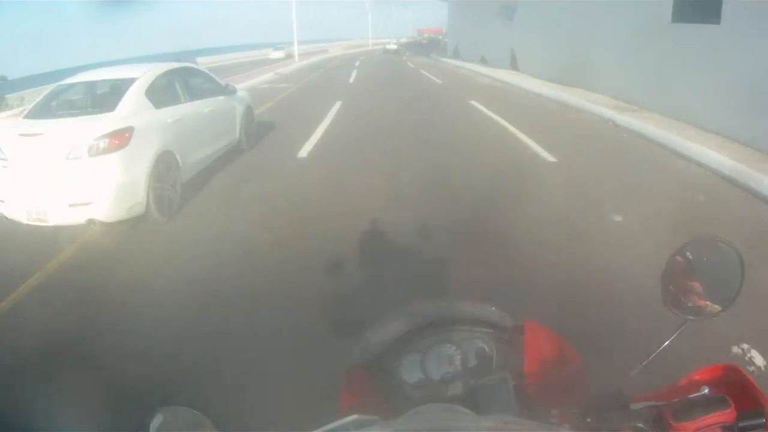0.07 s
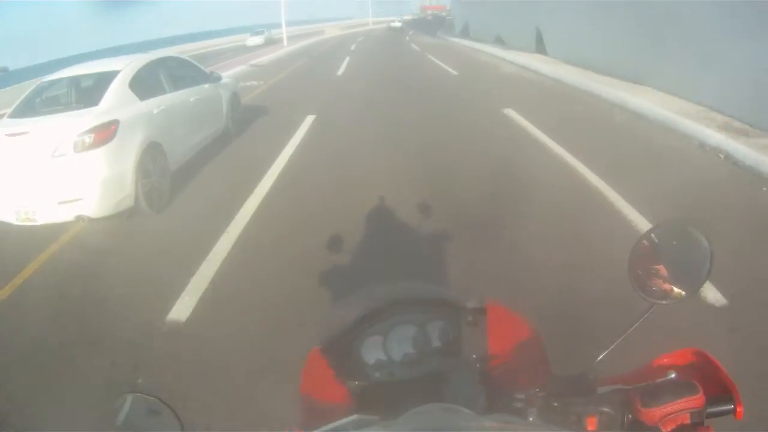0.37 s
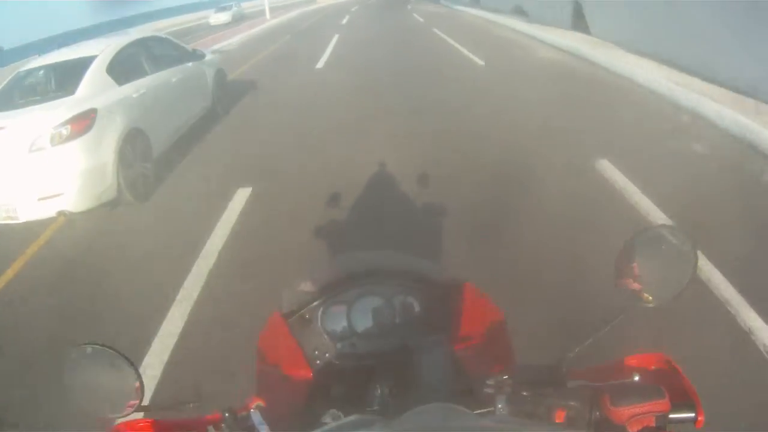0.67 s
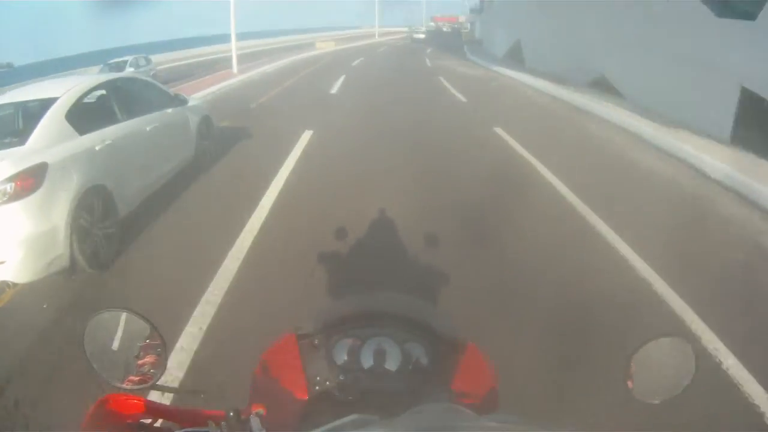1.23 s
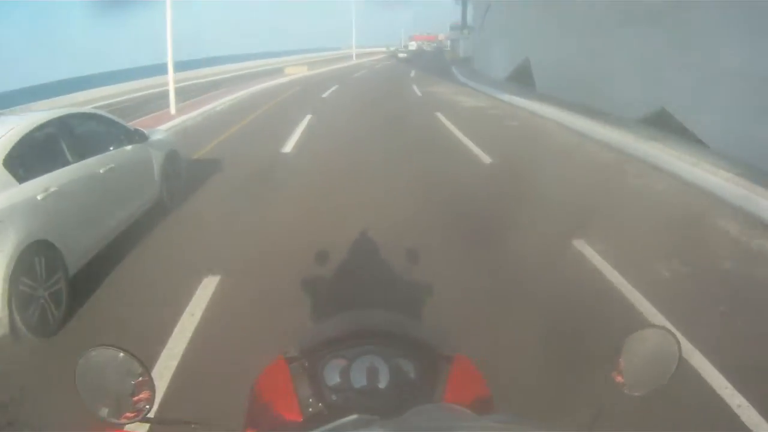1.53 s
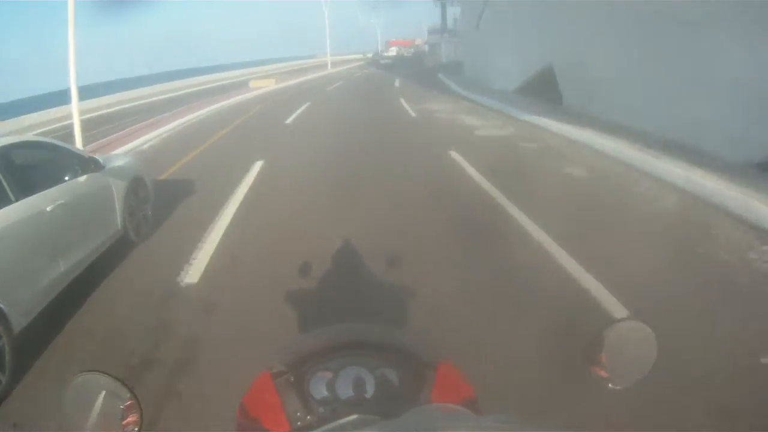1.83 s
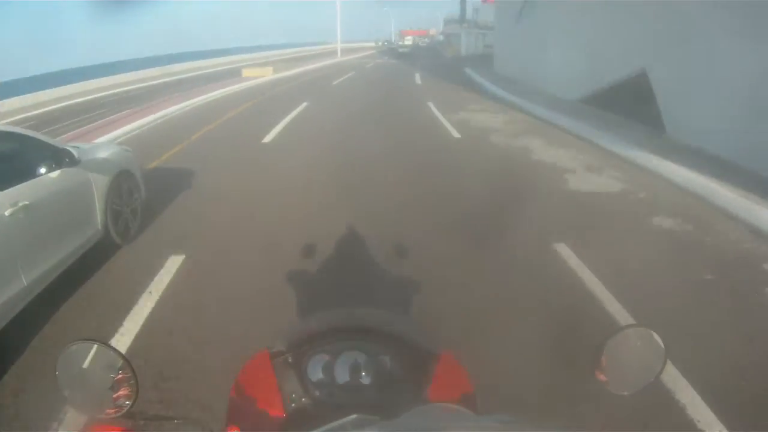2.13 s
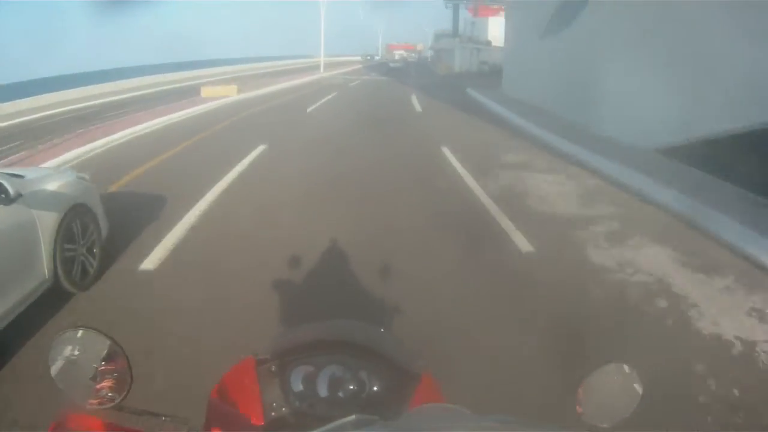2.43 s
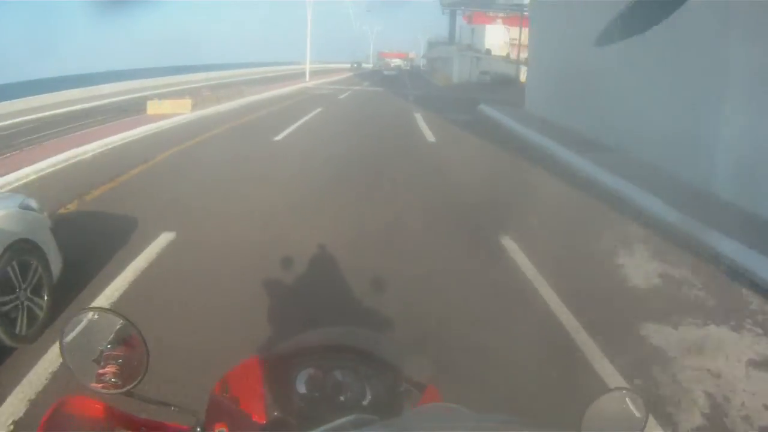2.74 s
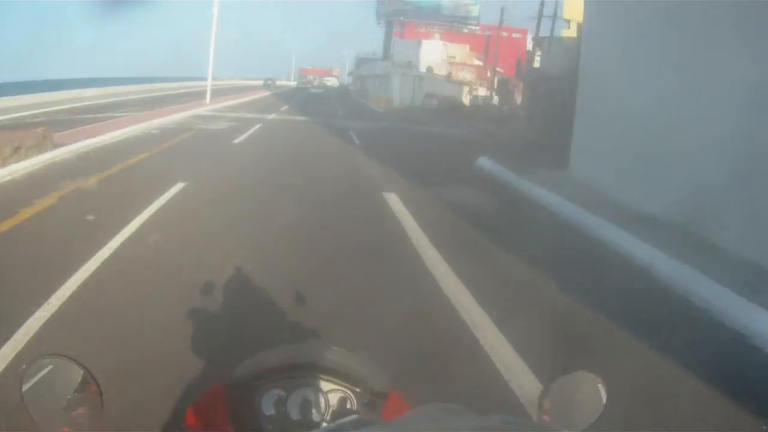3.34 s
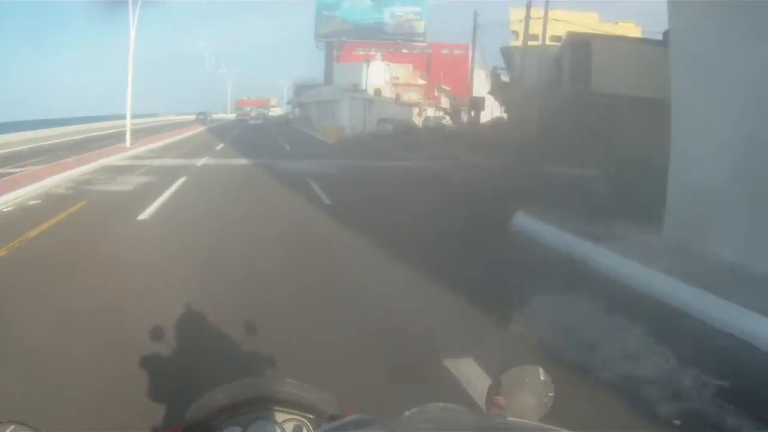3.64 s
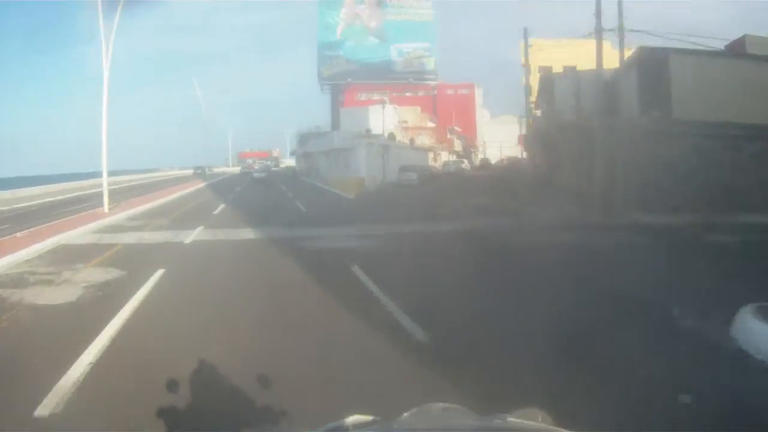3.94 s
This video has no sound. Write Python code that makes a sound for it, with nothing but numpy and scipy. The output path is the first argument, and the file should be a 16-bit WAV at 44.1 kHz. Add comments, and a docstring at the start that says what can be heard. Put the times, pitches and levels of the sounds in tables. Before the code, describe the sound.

A high air squeal wavers between raspy and piercing close to the microphone on a moving motorcycle. It sinks, breaks into chirps and dies away, over air hiss, wind thumps, tyre roar and engine drone.

```python
"""Air squeals near the microphone of a camera on a motorcycle rider, probably by crossing a narrow gap.
The jet of air swings across an edge and makes a wavering tone, now raspy, now locked into a clean
whistle. The squeal sinks, breaks into low chirps and dies away. Behind it are the hiss of the air,
wind thumping on the microphone, tyre roar and the drone of the engine, which swells as the
motorcycle passes a car on a coast road."""
import sys
import numpy as np
from scipy.fft import rfft, irfft, next_fast_len
from scipy.io import wavfile
from scipy.ndimage import uniform_filter1d, map_coordinates

SR = 44100
rng = np.random.default_rng(int(sys.argv[2]) if len(sys.argv) > 2 else 0)


def dump(signal):
    """Clip the signal to [-1, 1] and save it as 16-bit WAV at the path in sys.argv[1]."""
    limited = np.clip(np.atleast_2d(signal).T, -1, 1)
    pcm = np.round(limited * 32767).astype(np.int16)
    wavfile.write(sys.argv[1], SR, pcm)


N = 176400  # 4 seconds

# Levels in the tables are relative: the functions add their own gains.
# Wind on the microphone. Each row: time in seconds, level in dB.
BUFFET_LEVEL = [(0.0, -35), (0.55, -41), (0.62, -36), (2.45, -37), (2.56, -40), (2.7, -36.5), (3.56, -39),
                (3.74, -33), (3.81, -41), (4.0, -33)]
# Single gusts. Each row: middle in seconds, length in seconds, thump in dB, hiss in dB.
GUSTS = [(0.368, 0.063, -30, -53), (1.779, 0.075, -25.5, -43), (3.645, 0.092, -29, -44)]
# Tone colours of wind rumble and gust hiss. Each row: frequency in Hz, level in dB.
BUFFET_COLOUR = [(4, -17), (15, 5), (30, -0.5), (50, 0), (80, -7), (130, -9), (300, -46), (1000, -77)]
GUST_COLOUR = [(4000, -2), (10000, 0), (15000, -14)]

# Loudness of the tyre and machine roar, and of the engine. Each row: time in seconds, level in dB.
ROAR_LEVEL = [(0.0, -38.5), (1.6, -39), (2.1, -37.5), (3.8, -39), (4.0, -42)]
ENGINE_LEVEL = [(0, -44.5), (1.3, -41.5), (1.85, -37.5), (2.6, -42), (4, -44.5)]
# Tone colours of the roar and of the thrum of uneven firing. Each row: frequency in Hz, level in dB.
ROAR_COLOUR = [(40, -13), (110, -1), (170, 4), (250, -1), (350, -0.5), (480, -3), (600, -6.5), (780, 0),
               (950, 0), (1030, -3), (1150, 2.5), (1400, -3), (1600, -5), (2100, -5), (3000, -12.5),
               (6000, -27)]
THRUM_COLOUR = [(50, -30), (100, -4), (135, 1.5), (175, -7), (230, -9.5), (330, -10), (600, -34)]
# Resonances (pitches that ring) in the roar. Each row: frequency in Hz, width in Hz, level in dB.
ROAR_PEAKS = [(398, 17.6, -3.5), (691, 27, -7), (853, 71, -3.5), (1239, 49, -3), (1823, 45, -7.5)]
# The engine's tones. Each row: multiple of the firing rate, level in dB.
ENGINE_TONES = [(1, -20), (2, -9), (3, -8.5)]

# Airflow over the gap. Each row: time in seconds, level of its hiss in dB.
FLOW_LEVEL = [(0.0, -42.5), (0.3, -44), (0.81, -43.5), (0.93, -46), (0.98, -43.5), (1.17, -43.5),
              (1.19, -43), (1.69, -47), (1.7, -49.5), (2.27, -43.5), (2.52, -48), (3.27, -48.5),
              (3.59, -53.5), (3.7, -53), (4.0, -57)]
# Tone colour of that hiss. Each row: frequency in Hz, level in dB.
HISS_COLOUR = [(800, -6.5), (1800, 9.5), (2700, 7), (4300, 2.5), (5300, 9), (5700, 0), (6000, 5),
               (6550, -4.5), (7300, 9.5), (7700, 8), (8100, 0), (8800, 1.5), (10300, 6.5), (11400, 3.5),
               (12900, -7), (14000, -1.5), (15300, -14)]
# Resonances of the gap. Each row: frequency in Hz, width in Hz, level in dB.
GAP_PEAKS = [(3364, 580, -3), (3808, 190, 1.5), (7920, 420, -18.5)]
STRONG_FLOW_PEAKS = [(2286, 170, 4), (4490, 110, 5), (4984, 120, 10), (8190, 310, 0.5), (9400, 190, -24)]  # these need a strong flow
OCTAVE_PEAKS = [(8200, 260, 5.5), (9360, 420, 2)]  # these colour the octave, the tone at twice the jet's pitch

# Chirps. Each row: middle in seconds, length in seconds, pitch in Hz, level in dB.
CHIRPS = [(0.356, 0.027, 3620, -28), (0.467, 0.045, 3700, -27.5), (0.953, 0.018, 2310, -29),
          (.972, 0.022, 4870, -26.5), (1.281, 0.0049, 3665, -18.5), (1.304, .012, 3780, -28),
          (1.365, .009, 3710, -22.5), (1.384, 0.033, 4900, -23), (1.411, 0.014, 4920, -27),
          (1.496, 0.029, 2190, -30.5), (1.549, 0.018, 3240, -25), (1.787, .014, 4810, -32),
          (1.878, 0.05, 3240, -35), (2.165, 0.018, 4875, -27.5), (2.183, 0.011, 3500, -26),
          (2.228, 0.048, 2242, -28), (2.33, 0.029, 4920, -24), (2.371, 0.024, 4885, -25),
          (2.682, 0.034, 3250, -29.5), (2.736, .026, 3200, -30.5), (2.782, 0.027, 3090, -27.5),
          (2.822, 0.053, 3130, -34.5), (2.856, 0.029, 3160, -30), (2.861, 0.021, 3990, -31),
          (2.886, 0.031, 3240, -28.5), (2.94, 0.024, 3166, -26.5), (2.955, 0.0266, 3340, -29.5),
          (2.999, 0.027, 3990, -28), (3.037, 0.037, 4015, -31.5), (3.098, 0.035, 3320, -29),
          (3.122, .018, 4380, -36), (3.187, 0.028, 4200, -33.5), (3.35, 0.021, 2900, -33.5),
          (3.368, 0.019, 3000, -29.5), (3.423, 0.028, 3050, -32), (3.425, 0.019, 3770, -31.5),
          (3.45, .012, 2960, -28), (3.458, 0.021, 3830, -28), (3.463, 0.014, 2950, -32)]
# Chirps turn scratchy as the flow weakens. Each row: time in seconds, share of turbulence from 0 to 1.
CHIRP_RASP = [(2.3, .03), (2.7, .12)]
# The raspy squeal: a high stretch, then a low one. Each row: time in seconds, pitch in Hz, level in dB.
SQUEAL_STRETCHES = [
    [(0.0, 4590, -33.5), (0.12, 4770, -34), (0.18, 4540, -32.5), (0.28, 4592, -32.5), (0.54, 4797, -36),
     (0.59, 4680, -33.5), (0.77, 4766, -37), (0.86, 4710, -33.5), (0.91, 4350, -40), (0.97, 4780, -37),
     (1.0, 4620, -32.5), (1.32, 4680, -34.5), (1.41, 4810, -37), (1.55, 4155, -40.5), (1.66, 4500, -31.5),
     (1.73, 3774, -57), (1.79, 4467, -38.5), (1.91, 4080, -37), (1.935, 4300, -47), (1.955, 4520, -33),
     (1.995, 4300, -46), (2.14, 4450, -32), (2.185, 4150, -45), (2.24, 4553, -30.5), (2.38, 4830, -43),
     (2.42, 4410, -44)],
    [(2.48, 4200, -45), (2.64, 4160, -43), (2.74, 4086, -40), (2.81, 3885, -71), (2.89, 4080, -36),
     (2.94, 3950, -38), (2.984, 3911, -32.5), (3.06, 3947, -34.5), (3.15, 3880, -50), (3.25, 3910, -45)],
]
# The squeal's octave. Each row: time in seconds, level in dB relative to the squeal.
OCTAVE_LEVEL = [(1.4, -15), (1.55, -6), (1.87, -13.5), (2.0, -20), (2.2, -8), (2.28, -13), (2.34, -18),
                (2.93, -21), (3.02, -7.5), (3.08, -29)]
# The gap's lowest tone, about an octave below the squeal. Each row: time in seconds, level in dB.
UNDERTONE_LEVEL = [(0.0, -44), (1.17, -48.5), (1.32, -35), (1.5, -64), (1.57, -33.5), (1.72, -42),
                   (1.9, -45), (2.05, -33.5), (2.22, -39.5), (2.32, -49), (2.36, -32), (2.41, -39.5),
                   (2.9, -49.5), (3.02, -40), (3.12, -44.5)]
# Clean whistles, one list for each time the jet locks. Each row: time in seconds, pitch in Hz, level in dB.
WHISTLES = [
    [(0.21, 4500, -35), (0.23, 4490, -28), (0.288, 4640, -32), (0.314, 4500, -27), (0.325, 4560, -30)],
    [(0.372, 4820, -34), (0.376, 4872, -25.5), (0.398, 4980, -27.5), (0.412, 4878, -36)],
    [(0.497, 4790, -26), (0.515, 4920, -25.5), (0.535, 4946, -30), (0.547, 4900, -31.5)],
    [(0.67, 4774, -33), (0.714, 4885, -31.5), (0.736, 4840, -31), (0.78, 4787, -33), (0.8, 4640, -35)],
    [(0.87, 4570, -34), (0.882, 4493, -26), (0.902, 4240, -33), (0.934, 4462, -25), (0.952, 4380, -29),
     (0.965, 4830, -33)],
    [(1.1, 4480, -37), (1.13, 4414, -25.5), (1.14, 4597, -32), (1.16, 4490, -31), (1.175, 4276, -26)],
    [(1.432, 4530, -31), (1.438, 4456, -24.5), (1.452, 4620, -32), (1.464, 4560, -26.5), (1.53, 4240, -37)],
    [(1.565, 4340, -28), (1.573, 4410, -27.5), (1.647, 4504, -30.5), (1.679, 4400, -28.5),
     (1.705, 3640, -31.5), (1.712, 3773, -23)],
    [(1.778, 4590, -34), (1.796, 4500, -33.5), (1.815, 4305, -38)],
    [(2.015, 4400, -39), (2.048, 4534, -30), (2.075, 4420, -44), (2.11, 4403, -34.5), (2.135, 4380, -45)],
    [(2.205, 4414, -34), (2.245, 4530, -32), (2.315, 4640, -32)],
]


def amp(db):
    """Turn decibels into a gain to multiply by."""
    return 10 ** (np.asarray(db) / 20)


def unit(x):
    """Scale a signal to an average strength (rms) of 1."""
    return x / np.sqrt(np.mean(x ** 2) + 1e-20)


def curves(rows):
    """Join the rows with straight lines: one curve for each column after the time."""
    times, *columns = np.transpose(rows)
    return [np.interp(np.arange(N) / SR, times, column) for column in columns]


def wobble(rate):
    """A smooth curve through `rate` random values a second."""
    return map_coordinates(rng.standard_normal(8192), [np.arange(N) * rate / SR], mode="wrap")


def gate(rows, ramp_s=0.011):
    """1 from the first row's time to the last, 0 outside, with short ramps between."""
    t = np.arange(N) / SR
    sounding = (t > rows[0][0]) & (t < rows[-1][0])
    return uniform_filter1d(sounding.astype(float), int(ramp_s * SR))


def filtered(x, response):
    """Scale each frequency in x by the gain that `response` gives it."""
    size = next_fast_len(N + 8192)
    return irfft(rfft(x, size) * response(np.fft.rfftfreq(size, 1 / SR)), size)[:N]


def resonances(peaks, f):
    """The gain at frequency f: high near a peak, low away from it."""
    return sum(amp(db) / (1 + ((f - hz) / (width * 0.66)) ** 2) for hz, width, db in peaks)


def coloured_noise(colour):
    """Noise of strength 1 with the given tone colour."""
    hz, db = np.transpose(colour)
    white = rng.standard_normal(N)
    return unit(filtered(white, lambda f: amp(np.interp(np.log(f + 1), np.log(hz), db))))


def ringing_noise(peaks):
    """Noise of strength 1 that rings at the given resonances."""
    return unit(filtered(rng.standard_normal(N), lambda f: resonances(peaks, f)))


def phase_of(hz):
    """The angle that a tone of moving pitch has turned through so far."""
    return 2 * np.pi * np.cumsum(hz) / SR


def turbulence(phase, width_hz):
    """Swirling air: a narrow band of noise, strength 1, around a moving pitch."""
    a, b = [filtered(rng.standard_normal(N), lambda f: 1 / (1 + (f / width_hz) ** 2)) for _ in range(2)]
    return unit(a * np.cos(phase) + b * np.sin(phase))


def wind_buffeting(gain_db=3):
    """Wind hits the microphone in low, rumbling lumps."""
    level_db, = curves(BUFFET_LEVEL)
    return amp(level_db + gain_db + 0.35 * wobble(4.1)) * coloured_noise(BUFFET_COLOUR)


def gusts():
    """Short puffs thump and hiss on the microphone."""
    t, out = np.arange(N) / SR, np.zeros(N)
    thump, hiss = coloured_noise(BUFFET_COLOUR), coloured_noise(GUST_COLOUR)
    for middle, length, thump_db, hiss_db in GUSTS:
        swell = np.cos(np.pi * np.clip((t - middle) / length, -0.5, 0.5))
        out += swell * (amp(thump_db) * thump + amp(hiss_db) * hiss)
    return out


def road_roar(noise_db=1.5, ring_db=-2.5):
    """Tyres and machine make a steady roar with a few ringing pitches."""
    level_db, = curves(ROAR_LEVEL)
    gain = amp(level_db + 0.99 * wobble(12))
    return gain * (amp(noise_db) * coloured_noise(ROAR_COLOUR) + amp(ring_db) * ringing_noise(ROAR_PEAKS))


def engine(firing_hz=55.95, drift=0.0262, thrum_db=-3):
    """The cruising engine drones at multiples of its firing rate; uneven firing adds a thrum."""
    level_db, = curves(ENGINE_LEVEL)
    phase = phase_of(firing_hz * (1 + drift * wobble(12)))
    drone = sum(np.sqrt(2) * amp(db + 4.3 * wobble(18)) * np.sin(k * phase) for k, db in ENGINE_TONES)
    return amp(level_db) * (drone + amp(thrum_db) * coloured_noise(THRUM_COLOUR))


def air_hiss(hiss_db=7.5, gap_db=12.5, strong_flow_db=-45.5, treble_hz=11600):
    """Flowing air hisses and makes the gap ring; a faster flow sounds brighter."""
    flow_db, = curves(FLOW_LEVEL)
    above_average_db = flow_db - flow_db.mean()
    flutter_db = 0.4 * wobble(25.53) + 0.96 * wobble(130)
    noise = coloured_noise(HISS_COLOUR)
    treble = filtered(noise, lambda f: 1 - 1 / (1 + (f / treble_hz) ** 10))
    hiss = amp(flow_db + hiss_db) * (noise - treble + amp(0.33 * above_average_db) * treble)
    gap_ring = amp(flow_db + gap_db + 0.32 * wobble(60)) * ringing_noise(GAP_PEAKS)
    strong_flow_ring = amp(strong_flow_db + 3.37 * above_average_db) * ringing_noise(STRONG_FLOW_PEAKS)
    return amp(flutter_db) * (hiss + gap_ring + strong_flow_ring)


def chirps(gain_db=-0.5, octave_db=-13, jitter_hz=50, flutter_db=2.5):
    """The jet briefly catches one resonance of the gap: a scratchy tone swells and collapses."""
    t, out = np.arange(N) / SR, np.zeros(N)
    waver_hz = jitter_hz * wobble(450)
    flutter = amp(flutter_db * wobble(300))
    rasp, = curves(CHIRP_RASP)
    # Complex numbers let the scratch shake both the tone's strength and its phase.
    scratch = np.sqrt(1 - rasp) + np.sqrt(rasp / 2) * (wobble(500) + 1j * wobble(500))
    for middle, length, hz, db in CHIRPS:
        span = np.abs(t - middle) < length / 2
        swell = np.abs(np.cos(np.pi * (t[span] - middle) / length)) ** 0.5
        phase = phase_of(hz + waver_hz[span])
        tone = np.imag(scratch[span] * np.exp(1j * phase))
        octave = amp(octave_db) * resonances(OCTAVE_PEAKS, 2 * hz) * np.sin(2 * phase)
        out[span] += np.sqrt(2) * amp(db + gain_db) * swell * (tone + octave)
    return flutter * out


def clean_whistle(gain_db=2.5, octave_db=-14, jitter_hz=30.1, flutter_db=2):
    """The jet locks into a regular swing and gives a pure, piercing tone."""
    out = np.zeros(N)
    for rows in WHISTLES:
        hz, db = curves(rows)
        phase = phase_of(hz + jitter_hz * wobble(300))
        octave = amp(octave_db) * resonances(OCTAVE_PEAKS, 2 * hz) * np.sin(2 * phase)
        gain = amp(db + gain_db + flutter_db * wobble(150))
        out += gate(rows) * gain * np.sqrt(2) * (np.sin(phase) + octave)
    return out


def raspy_squeal(gain_db=4, jitter_hz=42, flutter_db=0.5, pure_share=0.3, under_widths_hz=(87, 180)):
    """The jet swings loosely at the edge: part tone, part turbulence, with an octave above and below."""
    under_db, = curves(UNDERTONE_LEVEL)
    octave_db, = curves(OCTAVE_LEVEL)
    out = np.zeros(N)
    for rows, under_width_hz in zip(SQUEAL_STRETCHES, under_widths_hz):
        hz, db = curves(rows)
        phase = phase_of(hz + jitter_hz * wobble(220))
        tone = np.sqrt(2 * pure_share) * np.sin(phase)
        rasp = np.sqrt(1 - pure_share) * turbulence(phase, width_hz=180)
        octave = turbulence(2 * phase, width_hz=260) + amp(0.5) * np.sin(2 * phase)
        octave = filtered(octave, lambda f: resonances(OCTAVE_PEAKS, f))
        octave *= amp(octave_db + 2.5 * wobble(39.6))
        under_phase = 0.497 * phase
        undertone = turbulence(under_phase, under_width_hz)
        if rows is SQUEAL_STRETCHES[0]:  # the undertone rings only in the high stretch
            undertone = unit(undertone + amp(-3.5) * np.sin(under_phase))
        gain = amp(db + gain_db + flutter_db * wobble(70))
        out += gate(rows) * (gain * (tone + rasp + octave) + amp(under_db + 1.5) * undertone)
    return out


def scene(squeal_dip_db=-3, hiss_dip_db=-1):
    """All sounds meet at one microphone. A locked jet sheds less turbulence, so rasp and hiss dip."""
    locked = sum(gate(rows) for rows in WHISTLES)
    jet = clean_whistle() + chirps() + amp(squeal_dip_db * locked) * raspy_squeal()
    hiss = amp(hiss_dip_db * locked) * air_hiss()
    return (jet + hiss + road_roar() + engine() + wind_buffeting() + gusts())[None]


def record(dry, top_hz=15350):
    """The camera keeps no sound above its highest frequency."""
    return filtered(dry[0], lambda hz: hz < top_hz)[None]


dry = scene()
out = record(dry)
dump(out)
```